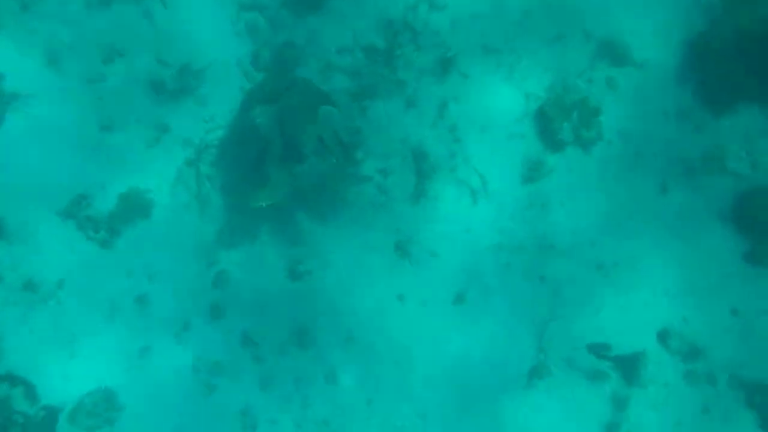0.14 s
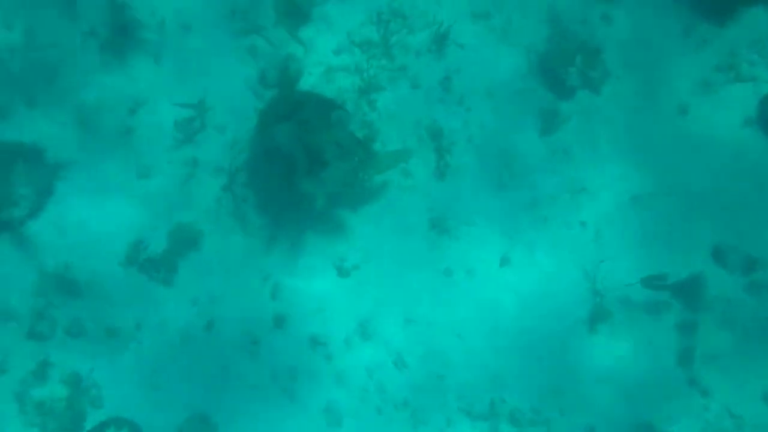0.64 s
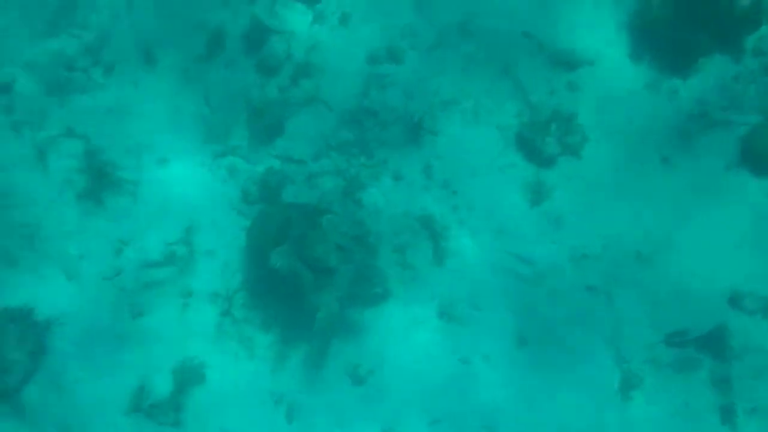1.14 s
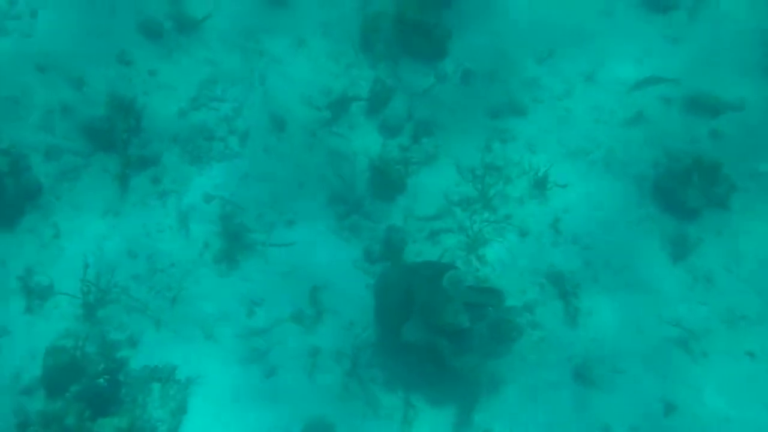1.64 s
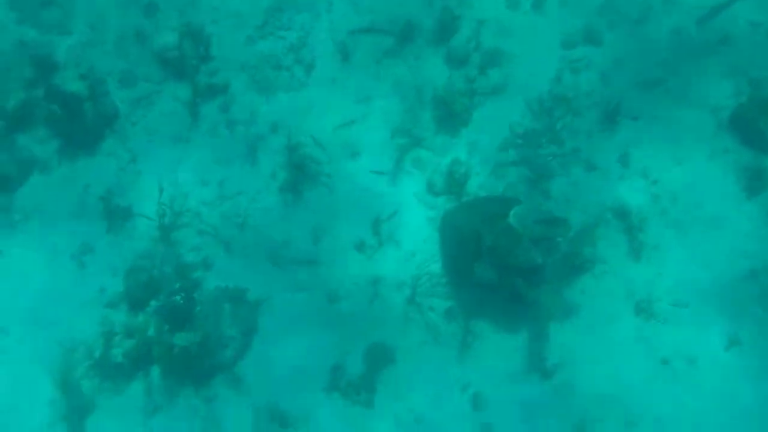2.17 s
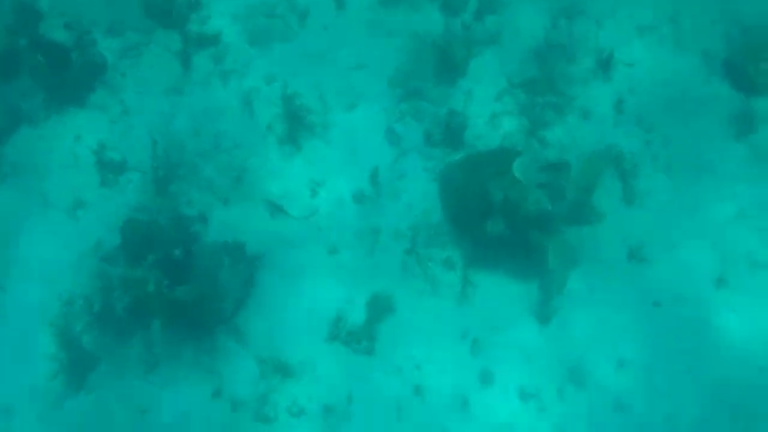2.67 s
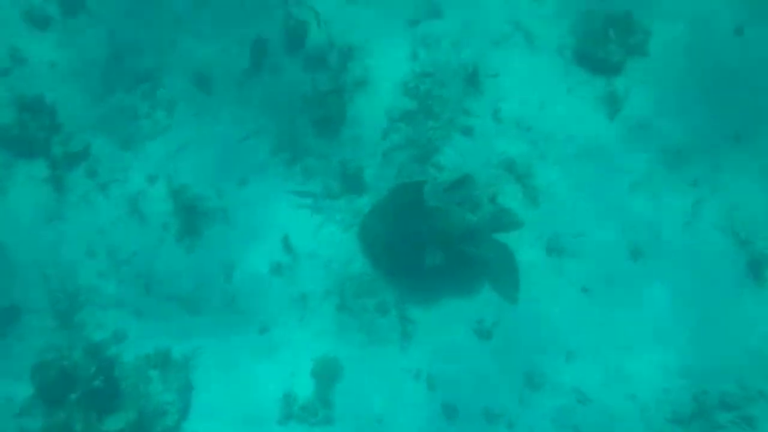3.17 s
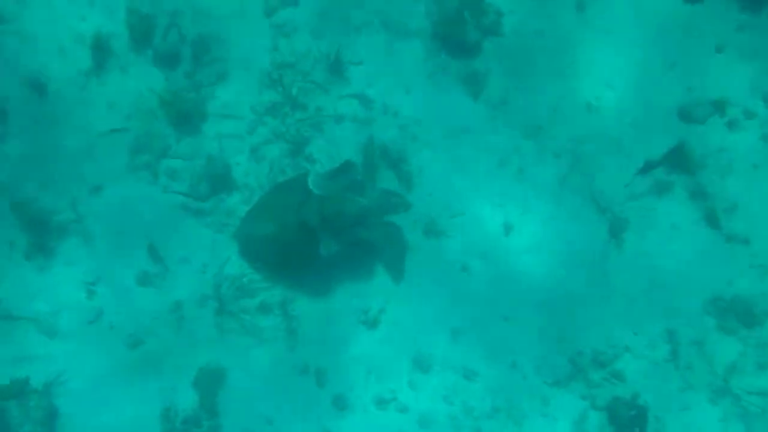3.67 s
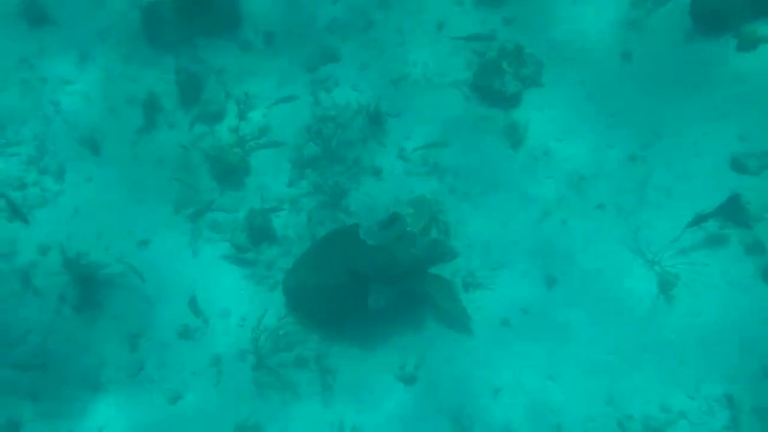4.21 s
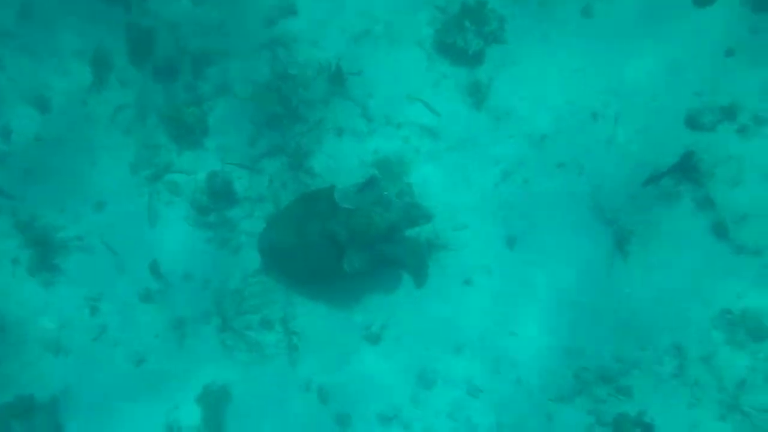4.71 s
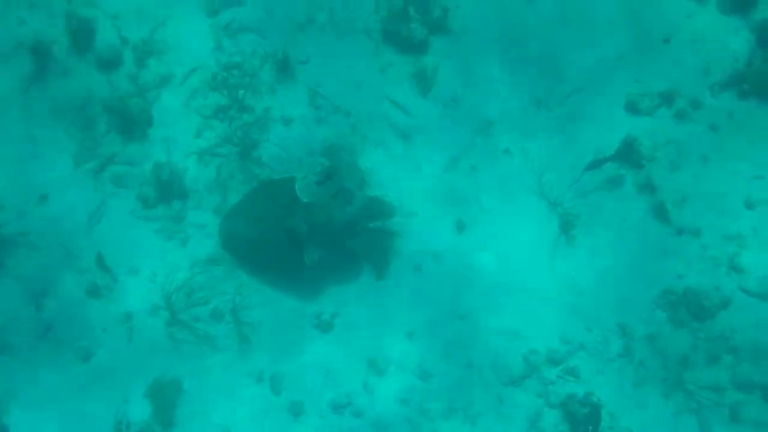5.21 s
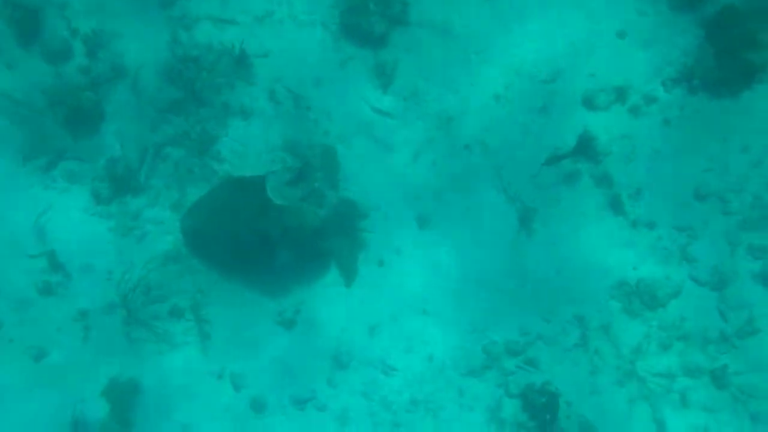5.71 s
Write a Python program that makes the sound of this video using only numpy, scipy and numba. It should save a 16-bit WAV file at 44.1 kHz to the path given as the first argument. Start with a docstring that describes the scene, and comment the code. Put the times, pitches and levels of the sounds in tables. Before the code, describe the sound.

A camera sealed in its housing moves above a shallow reef, hearing water through the wall: hollow, boxy, with little deep bass. Sharp shrimp snaps and tiny crackles run throughout over grainy, chirping reef hiss, with faint dull buffeting and a thin high electronic whine. Slosh sinks to a lull around 0.4-0.55 s, then surges with rounded gulps from 0.6 to 1.3 s. A very loud snap at 1.2 s ducks everything for a moment, followed by a gulp and bubble pips. Another lull comes near 1.55 s. Gulps build to a heavy one at 2.7 s, where a jolt chokes the sound and thin ticks flutter. A strong snap sounds at 3.1 s; a second hush with weaker ticks follows at 3.2 s. Bright pips lead into the biggest, humming, gulping surge at 4.1-4.8 s. Water quiets by 5.2 s, with small gulps returning near 5.6 s.

```python
"""Swells slosh and gurgle round a sealed camera housing over a shallow reef: showers of clicks, filtered by the wall,
make the slosh, and ringing grains make the gulps, bubbles and pips. Shrimp snaps and a few lower knocks are short
noisy rings with a scattered echo. Sudden one-sided pushes, short or lasting, make a limiter duck the sound, and
trains of thin ticks flutter in the hush. Behind lie dull buffeting and knocks (low clicks) and a faint electronic
whine (two tones that flip sign)."""
import sys
import numpy as np
from scipy import signal
from scipy.fft import rfft, irfft
from scipy.io import wavfile
from scipy.ndimage import uniform_filter1d, map_coordinates
from numba import njit

SR = 44100
rng = np.random.default_rng(int(sys.argv[2]) if len(sys.argv) > 2 else 0)


def undo_db(level):
    """Turn decibels back into plain size, where 20 dB means ten times bigger."""
    steps = np.asarray(level, float) / 20
    return 10 ** steps


def put_to_file(sound):
    """Save the sound as 16-bit audio at rate SR, in the file named by the first command-line argument."""
    columns = np.atleast_2d(sound).T  # one column per channel
    safe = np.clip(columns, -1, 1)
    whole_steps = np.round(safe * 32767)
    wavfile.write(sys.argv[1], SR, whole_steps.astype(np.int16))


N = 257544  # length in samples


def times():
    """Seconds of every sample."""
    return np.arange(N) / SR


def unit(x):
    """Scale to rms 1."""
    return x / np.sqrt(np.mean(x ** 2))


def colour(x, points, size=4096):
    """Causal filter with the given spectrum, built from the cepstrum of its log gain."""
    hz, db = np.transpose(points)
    bins = np.maximum(np.arange(size // 2 + 1), 1) * SR / size
    gain_db = np.interp(np.log(bins), np.log(hz), db)
    cepstrum = irfft(np.log(undo_db(gain_db)))
    # folding the second half onto the first makes the filter respond as early as it can
    cepstrum[1:size // 2] *= 2
    cepstrum[size // 2 + 1:] = 0
    response = irfft(np.exp(rfft(cepstrum)))
    return signal.fftconvolve(x, response)[:N]


def band(x, lo_hz, hi_hz, order=2):
    """Band-pass: keep what lies between two frequencies."""
    return signal.sosfilt(signal.butter(order, [lo_hz, hi_hz], "band", fs=SR, output="sos"), x)


def add(out, s, gain, hz, t60, rise, glide=0.):
    """One ringing grain: swells for `rise` s, then dies by 60 dB in `t60` s while its pitch glides up."""
    t = np.arange(int((rise + t60) * SR)) / SR
    swell = np.sin(np.pi / 2 * np.minimum(t / rise, 1)) ** 2
    decay = 1000. ** (-np.maximum(t - rise, 0) / t60)
    grain = gain * swell * decay * np.sin(2 * np.pi * hz * t * (1 + glide * t / t60))
    i = max(int(s * SR), 0)
    out[i:i + len(t)] += grain[:N - i]


def sparks(per_s, spread_db):
    """Random clicks of either sign; a few stand out if the spread is positive, or are fainter if negative."""
    chance = rng.random((3, N))
    happens = chance[0] < per_s / SR
    sign = np.sign(chance[1] - .5)
    size_db = -spread_db * np.log(1 - .985 * chance[2])
    return happens * sign * undo_db(size_db)


def patches(per_s):
    """Slow chance: random levels, so many a second, joined smoothly."""
    return map_coordinates(rng.standard_normal(N // 100), [times() * per_s])


def arch(s, length):
    """Half a sine over the given span, silent elsewhere."""
    return np.sin(np.pi * np.clip((times() - s) / length, 0, 1))


# strength of the swell at the housing: (t/s, slosh level/dB)
SWELL = [(0, -39.5), (.4, -52.5), (.55, -52), (.7, -36), (1.1, -33), (1.3, -35), (1.55, -49), (1.75, -39),
         (2, -39.5), (2.5, -37), (2.72, -30.5), (2.95, -37.5), (3.45, -37), (3.7, -43), (3.9, -44),
         (4.15, -27), (4.4, -39), (4.75, -34.5), (4.85, -41), (5.2, -50.5), (5.84, -41.5)]
MIDDLING_DB = -40  # slosh level of a middling swell


def swell_level():
    """The swell rises and falls in straight lines between the points of its table, in dB."""
    s, db = np.transpose(SWELL)
    return np.interp(times(), s, db)


# colour of the slosh through the housing wall: (f/Hz, gain per frequency, level/dB)
SLOSH_COLOUR = [(71, -81), (120, -51), (264, -19.5), (380, -7), (438, -5), (466, -7.5), (567, -33),
                (683, -23.5), (773, -38.5), (1000, -45), (2200, -120)]


def gurgles(level_db):
    """Dense little gurgles, heard as clicks that ring the air space of the housing."""
    return undo_db(level_db) * unit(colour(sparks(per_s=900, spread_db=3.0), SLOSH_COLOUR))


# air pockets that gulp at the housing: (t/s, peak level/dB, f/Hz, t60/s)
GULPS = [(0.608, -27.5, 426, 0.062), (0.674, -27, 299, 0.085), (0.77, -14.5, 377.7, 0.16),
         (0.863, -23, 450, 0.023), (1.011, -19, 384, 0.075), (1.256, -18, 777, 0.041),
         (1.256, -11, 390, 0.05), (1.869, -27, 430, 0.14), (2.19, -24.5, 427, 0.043),
         (2.364, -21, 331, 0.074), (2.507, -19.5, 359, 0.088), (2.648, -20.5, 345, 0.054),
         (2.736, -10, 421.4, 0.093), (3.446, -24.5, 470, 0.15), (3.822, -32.5, 350, 0.15),
         (3.931, -26.5, 300, 0.061), (4.093, -19, 418, 0.17), (4.232, -15, 420, 0.098),
         (4.27, -17, 429.3, 0.13), (4.395, -19.5, 404, 0.047), (4.568, -21, 423, 0.08),
         (4.605, -20, 400, 0.085), (4.764, -21.5, 417, 0.071), (5.554, -25, 317, 0.1),
         (5.666, -25.5, 430, 0.053)]


def gulps():
    """Each air pocket rings at its own pitch, which slides up as it dies."""
    out = np.zeros(N)
    for s, db, hz, t60 in GULPS:
        add(out, s, undo_db(db), hz, t60, rise=0.11 * t60, glide=0.062)
    return out


# smaller bubbles and short ringing pips: (t/s, level/dB before they waver, f/Hz)
BUBBLES_AND_PIPS = [(0.865, -36, 1260), (0.896, -28.5, 2700), (1.268, -23, 1090), (1.371, -34.5, 1052),
                    (1.411, -31, 675), (2.158, -26.5, 648), (2.998, -34.5, 657), (3.344, -34.5, 2040),
                    (3.376, -38, 800), (3.539, -35, 653), (3.627, -34, 1970), (3.644, -38.5, 1720),
                    (3.841, -35, 1790), (3.842, -32, 2580), (3.8554, -22.5, 2550), (4.1129, -16.5, 1253),
                    (4.699, -25, 1940)]


def bubbles_and_pips():
    """Short rings that slide up in pitch; higher ones die sooner, and all waver in loudness."""
    out = np.zeros(N)
    for s, db, hz in BUBBLES_AND_PIPS:
        add(out, s, undo_db(db), hz, t60=65 / hz, rise=0.0012, glide=0.046)
    return out * (1 + 0.15 * patches(250))


# rushes of many tiny bubbles: (t/s, length/s, level/dB, centre f/Hz)
SWISHES = [(0.928, 0.13, -33.5, 286), (1.307, 0.056, -42, 1770), (2.126, 0.058, -35.5, 664),
           (2.343, 0.15, -37, 344), (2.674, 0.094, -40, 717) ]


def swishes(froth):
    """Bubbly clicks, kept in a band round one pitch, swell and fade in each rush."""
    out = np.zeros(N)
    for s, length, db, hz in SWISHES:
        rush = unit(band(froth, hz / 1.217, hz * 1.162, order=3))
        out += undo_db(db) * arch(s, length) * rush
    return out


def hum(froth):
    """At the height of the strongest swell the air space hums: bubbly clicks in a very narrow band."""
    centre_hz, width_hz = 436.5, 38.4
    tone = unit(band(froth, centre_hz - width_hz / 2, centre_hz + width_hz / 2))
    shape = np.sqrt(arch(4.05, length=0.785).clip(0))
    return undo_db(-31) * shape * tone


def fizz(level_db):
    """Many small bubbles, in two groups of pitch, ring at random in uneven patches."""
    out = np.zeros(N)
    for when, size, pick in rng.random((1600, 3)):
        group_hz = 680 if pick < .48 else 1100
        hz = group_hz * (.88 + 0.31 * (7 * pick % 1))
        gain = undo_db(-3.0 * np.log(1 - .98 * size))
        add(out, when * N / SR, gain, hz, t60=0.054, rise=0.0013, glide=0.11)
    return undo_db(level_db + 2.2 * patches(10)) * unit(out)


def slosh(swell_db, fizz_db):
    """Gurgles ring the air space; single gulps, bubbles and pips stand out over a fizz of small bubbles."""
    froth = sparks(per_s=2500, spread_db=-11.5)
    single = gulps() + bubbles_and_pips()
    return gurgles(swell_db) + single + swishes(froth) + hum(froth) + fizz(fizz_db)


# near snaps, and a few lower knocks:
# (t/s, ring level/dB, ring f/Hz, treble level/dB relative to the ring, before filters)
SNAPS_AND_KNOCKS = [(0.0286, -20.5, 2670, -14), (0.1078, -36.5, 2050, 7), (0.2605, -24.5, 2500, -2),
                    (0.3052, -19.5, 1930, -4.5), (0.516, -24, 2540, -11), (0.565, -30.5, 2380, -25),
                    (0.7425, -19.5, 2570, 1), (0.7937, -40, 1990, 17), (0.9813, -10, 2435, -42),
                    (0.989, -22.5, 2740, -21), (1.1708, -26, 2470, -20), (1.2114, 3, 2614, -25),
                    (1.27, -22, 2500, 1.5), (1.2865, -24.5, 2600, 1), (1.41, -35.5, 2880, 2.5),
                    (1.5938, -32.5, 2660, -5), (1.6591, -27.5, 2530, 5), (1.8935, -45, 2670, 21),
                    (1.992, -39.5, 2520, 11), (2.025, -25.5, 2600, -5), (2.0684, -29, 2280, -9),
                    (2.4228, -16.5, 2500, 1), (2.7427, -28, 1370, -10), (3.0505, -16, 2810, -1.5),
                    (3.1184, -9.5, 2520, -22), (3.203, -22.5, 1220, -4.5), (3.261, -26.5, 2670, -9),
                    (3.4435, -37, 2400, 8), (3.5402, -21.5, 2660, -7), (3.7464, -17, 1980, -0.5),
                    (3.7809, -29, 2780, -7), (4.0192, -23.5, 2450, -15), (4.0928, -16, 1230, -11.5),
                    (4.2084, -35, 2450, 15.5), (4.2465, -19.5, 2660, -6), (4.3365, -44.5, 2500, 19),
                    (4.542, -25, 2500, -7.5), (4.6793, -14.5, 2510, -7.5), (4.726, -32.5, 2480, 8.5),
                    (4.765, -30.5, 2550, -25), (4.82, -26.5, 2260, 0), (4.882, -31.5, 2600, 1),
                    (5.0625, -52, 2560, -10), (5.1506, -38, 1980, 6), (5.188, -26.5, 2160, 1),
                    (5.265, -38, 2290, -16), (5.373, -29, 2590, -34)]
# colour of the crackle through the housing wall: (f/Hz, gain per frequency, level/dB)
CRACKLE_COLOUR = [(530, -52), (900, -14), (1110, 5), (1420, -10), (2480, 2), (2800, 5), (3370, -7.5),
                  (4070, -3), (4760, -14.5), (6470, -3), (9500, -15.5), (12400, -24), (20900, -120)]


def near_snaps_and_knocks():
    """Each is a dry crack or knock made of a short ringing tone, a noisy body and a treble tick."""
    ring, body, tick = np.zeros((3, N))
    length = 200  # samples of noise in each
    t = times()[:length]
    burst = np.minimum(t / .0005, 1) * 1000. ** (-t / .006)
    noises = rng.standard_normal((len(SNAPS_AND_KNOCKS), 2, length))
    for (s, db, hz, treble_db), noise in zip(SNAPS_AND_KNOCKS, noises):
        add(ring, s, undo_db(db), hz, t60=0.0094, rise=0.0007)
        i = int(s * SR)
        body[i:i + length] += undo_db(db) * noise[0] * burst
        tick[i:i + length] += undo_db(db + treble_db) * noise[1] * burst
    body = undo_db(9.0) * band(body, 825, 2900, order=4)
    tick = undo_db(12.0) * band(colour(tick, CRACKLE_COLOUR), 3170, 9500, order=3)
    return ring + body + tick


def far_snaps(far_db):
    """Each far snap is a click with its own colour: dull, middling or bright."""
    dull = undo_db(9.0) * band(sparks(per_s=120, spread_db=6.0), 1520, 2770, order=3)
    middling = band(sparks(per_s=110, spread_db=9), 3950, 6340, order=3)
    bright = band(sparks(per_s=160, spread_db=8.0), 6300, 11660, order=3)
    return undo_db(far_db + 3.0) * unit(colour(dull + middling + bright, CRACKLE_COLOUR))


def echo(near, far):
    """Surface and sea floor return the sound as a short scatter of random reflections."""
    t = times()[:SR // 8]
    reflections = rng.standard_normal(len(t)) * (rng.random(len(t)) < .03)
    scatter = reflections * 1000. ** (-t / 0.13) * (t > .004)
    scatter[int(.0075 * SR)] += 1.2  # the bounce off the surface
    # the nearest, loudest sounds are the driest
    sent = 0.29 * np.tanh(near / 0.15) + far
    return undo_db(-23.5) * signal.fftconvolve(sent, scatter)[:N]


def reef_hiss(far_db):
    """The whole distant reef merges into a grainy hiss of dense clicks."""
    grains = unit(colour(sparks(per_s=2300, spread_db=-2.5), CRACKLE_COLOUR))
    return undo_db(far_db - 0.5 + 2.2 * patches(12)) * grains


def chirps(far_db):
    """Snaps at middle distance keep only a short chirp, each on its own pitch."""
    out = np.zeros(N)
    for when, size, pitch in rng.random((1400, 3)):
        gain = undo_db(-4.5 * np.log(1 - .985 * size))
        add(out, when * N / SR, gain, 1900 * 1.58 ** pitch, t60=0.028, rise=0.0005, glide=0.04)
    return undo_db(far_db + 2.3 + 3.5 * patches(11)) * unit(out)


def snaps_and_knocks(far_db):
    """Near snaps and knocks and far snaps with their echo, over the hiss and chirps of the reef."""
    near, far = near_snaps_and_knocks(), far_snaps(far_db)
    return near + far + echo(near, far) + reef_hiss(far_db) + chirps(far_db)


# sudden one-sided pushes that duck the sound, short or lasting: (t/s, peak level/dB, length/s)
PUSHES = [(1.2133, 17, 0.003), (2.7435, 14, 0.023), (3.2055, 9, 0.03)]


def pushes():
    """One-sided pushes that arrive at once and ebb away; they only drive the limiter and are not heard."""
    out = np.zeros(N)
    for s, db, length in PUSHES:
        ebb = np.clip(1 - ((times() - s) / length) ** 2, 0, 1)
        out += undo_db(db) * (times() > s) * ebb
    return out


# trains of thin ticks in the hush after the lasting pushes begin:
# (start t/s, first tick level/dB before its filter)
FLUTTERS = [(2.7432, -22), (3.2185, -26)]


def ticks():
    """In the hush of each lasting push a train of thin clicks flutters and fades; later ones often drop out."""
    count, gap_s, fade_db = 14, .00362, -1.4  # the fade is from tick to tick
    out, k = np.zeros(N), np.arange(count)
    for (s, db), chance in zip(FLUTTERS, rng.random((len(FLUTTERS), 2, count))):
        stays = chance[0] > (k / count) ** 2
        sign = np.sign(chance[1] - .5)
        out[((s + k * gap_s) * SR).astype(int)] = undo_db(db + fade_db * k) * stays * sign
    return band(out, 300, 7000, order=1)


# bouts of water dragging on the housing: (t/s, length/s, level/dB before the last filter)
BUFFETS = [(0.418, 0.38, -53.5), (0.772, 0.38, -59), (2.447, 0.54, -61.5), (3, 0.35, -49)]
# dull knocks of water on the case: (t/s, level/dB before the last filter)
THUMPS = [(0.602, -31), (0.656, -32), (2.739, -24), (3.082, -38), (3.197, -32)]


def drag(swell_db):
    """Dull irregular buffeting with single knocks, too damped to have a pitch; it grows with the swell."""
    gain = undo_db(-81 + 0.65 * (swell_db - MIDDLING_DB))  # dB per dB of swell
    for s, length, db in BUFFETS:
        gain = gain + undo_db(db) * arch(s, length)
    rumble = band(sparks(per_s=130, spread_db=5.0), 57, 410)
    out = gain * unit(band(rumble, 9.1, 270, order=1))
    for s, db in THUMPS:
        add(out, s, undo_db(db), hz=131, t60=0.0035, rise=0.0054)
    return band(out, 35, 2000, order=1)


def whine(level_db):
    """A tone whose sign flips at a steady rate, with a weaker mirror tone above; each flip ticks."""
    tone_hz, mirror_hz, flips_per_s = 10865.2, 11186.8, 82.318
    sign = np.sign(np.sin(np.pi * flips_per_s * times() + .3))
    pulses = 16 * uniform_filter1d(np.gradient(sign), size=15)  # the tick at each flip
    flips = sign + 1j * pulses
    turn = 2j * np.pi * times()
    mirror = undo_db(-5.0) * flips.conj() * np.exp(mirror_hz * turn)
    tones = flips * np.exp(tone_hz * turn) + mirror
    return undo_db(level_db) * tones.real


# the reef crackle, the fizz and the whine sink together in lulls: (middle t/s, half width/s, depth level/dB)
LULLS = [(.35, 0.19, -11), (1.55, 0.17, -6.5)]


def lull_level():
    """Bell-shaped dips, in dB."""
    return sum(db * np.exp(-((times() - s) / width) ** 2) for s, width, db in LULLS)


def scene():
    """All that is heard at the sealed microphone; the stiff wall passes little bass from the open water."""
    swell_db, lull_db = swell_level(), lull_level()
    # base levels hold outside the lulls; the factors are dB per dB
    fizz_db = -55.5 + 0.69 * (swell_db - MIDDLING_DB) + 0.74 * lull_db
    crackle_db = -56 + lull_db
    whine_db = -60 + 0.46 * lull_db
    water = band(slosh(swell_db, fizz_db) + snaps_and_knocks(crackle_db), 88, 22000)
    return (water + drag(swell_db) + whine(whine_db))[None]


@njit
def peak_follow(x, top, attack, fall):
    """How far the sound is over the ceiling: quick to rise, falling at a steady dB rate."""
    over, e = np.empty(len(x)), 1.
    for i in range(len(x)):
        a = abs(x[i]) / top
        if a > e:
            e = e + (a - e) * attack
        else:
            e = max(e * fall, 1.)
        over[i] = e
    return over


def band_limit(x):
    """A steep low-pass at the top of the band."""
    return signal.sosfilt(signal.butter(12, 16410, fs=SR, output="sos"), x)


def record(dry):
    """A limiter, which also feels the pushes, ducks all after an overload; the top is cut, loud peaks rounded."""
    fall = float(undo_db(-190 / SR))  # lets go at 190 dB a second
    over = peak_follow(dry[0] + pushes(), top=.6, attack=0.019, fall=fall)
    limited = dry[0] / over + ticks()
    top_cut = signal.cheby1(10, .5, 11300, fs=SR, output="sos")  # low-pass, Hz
    limited = signal.sosfilt(top_cut, limited)
    rounded = limited / (1 + (limited / .74) ** 6) ** (1 / 6)  # peaks bend towards .74
    return band_limit(rounded[None])


dry = scene()
out = record(dry)
put_to_file(out)
```